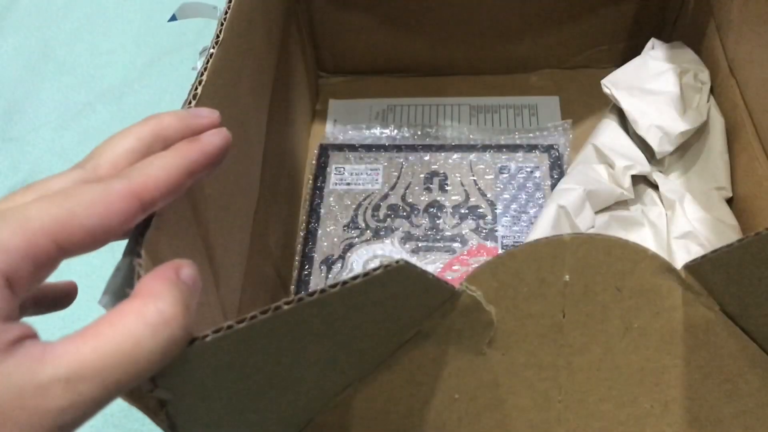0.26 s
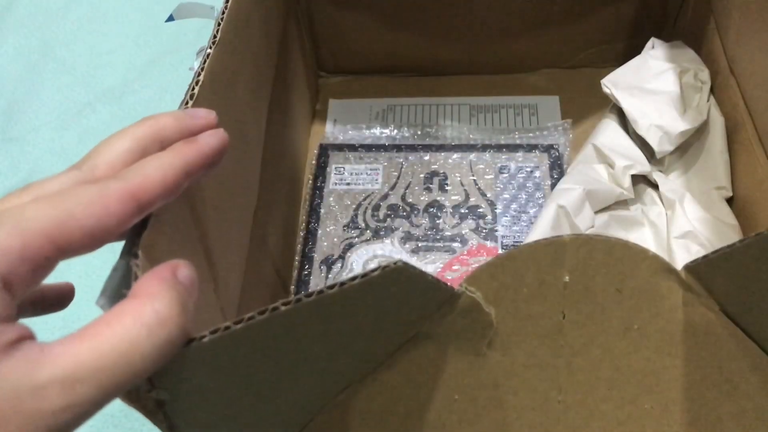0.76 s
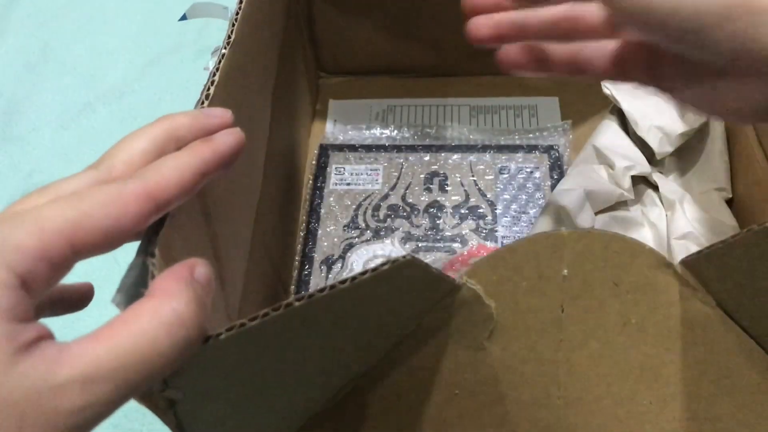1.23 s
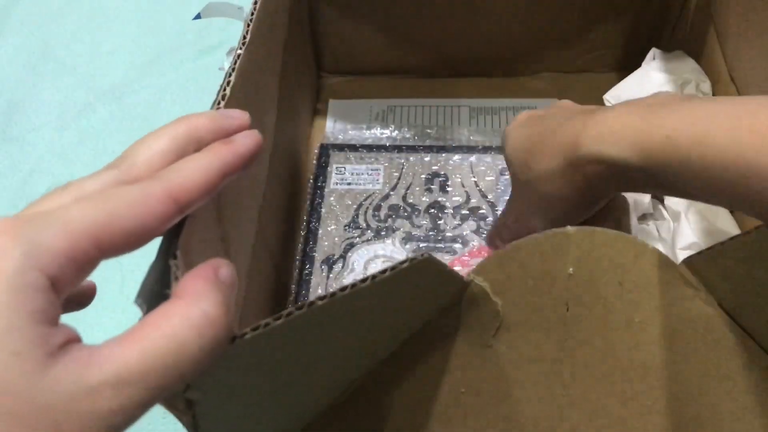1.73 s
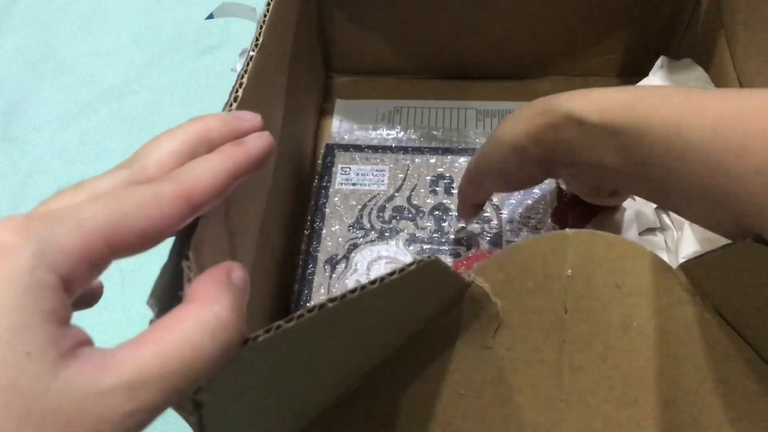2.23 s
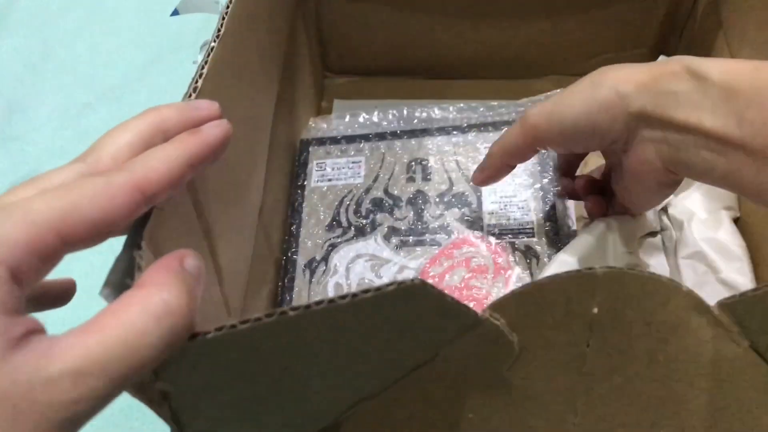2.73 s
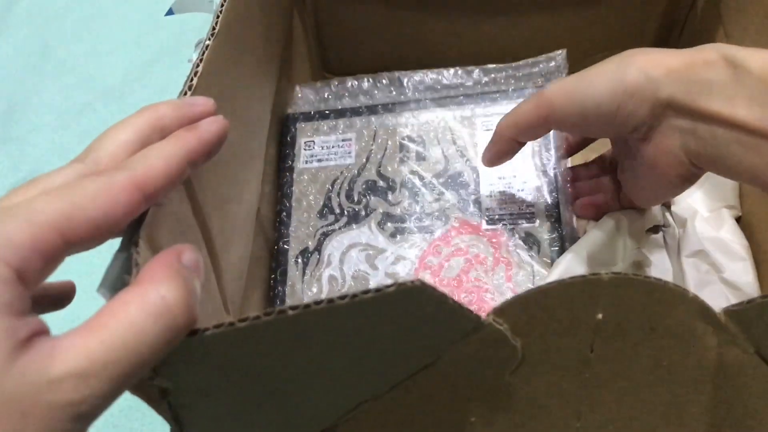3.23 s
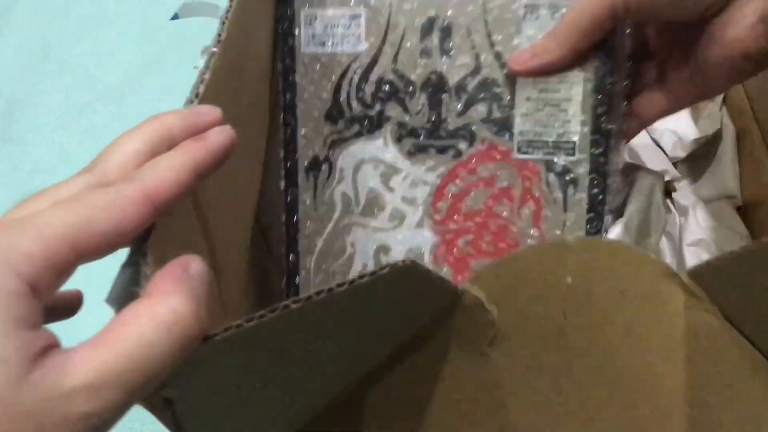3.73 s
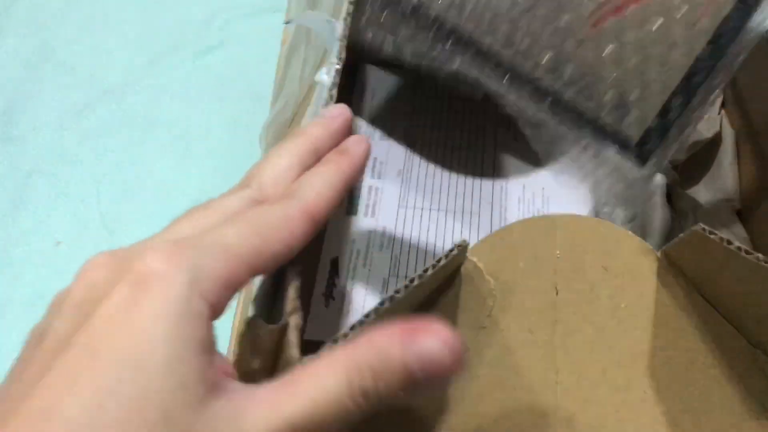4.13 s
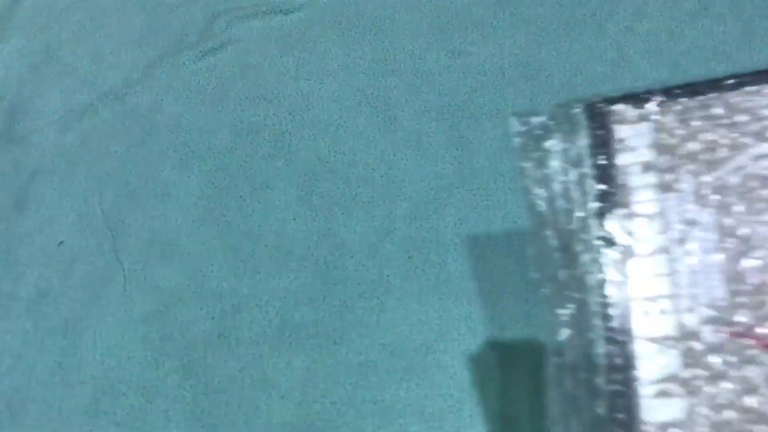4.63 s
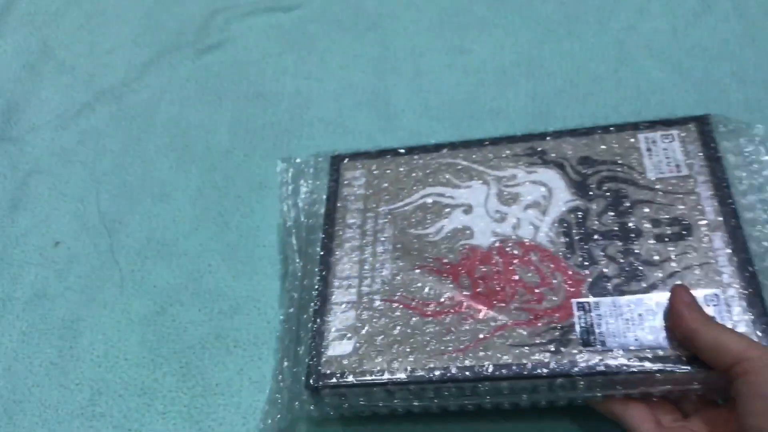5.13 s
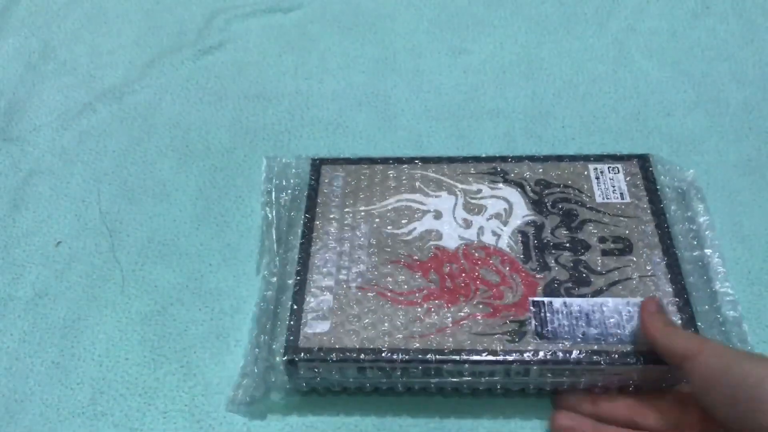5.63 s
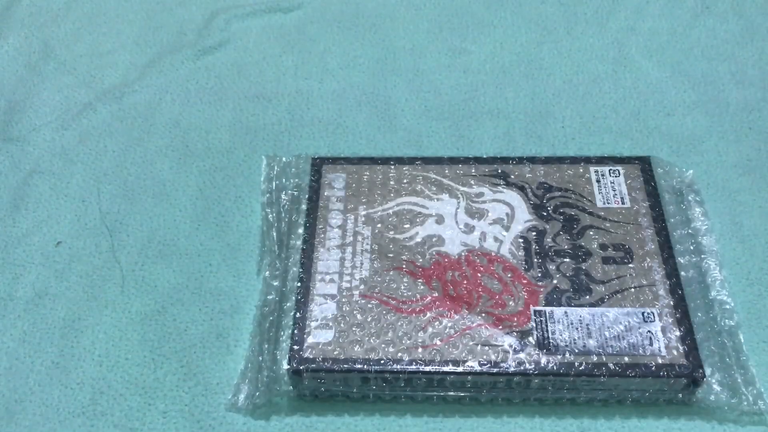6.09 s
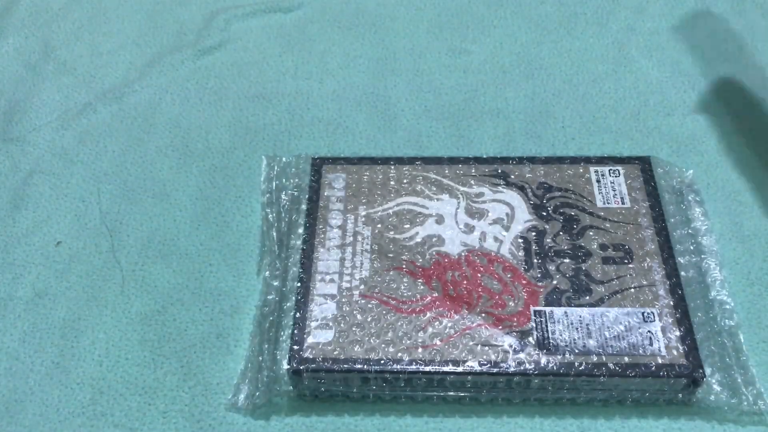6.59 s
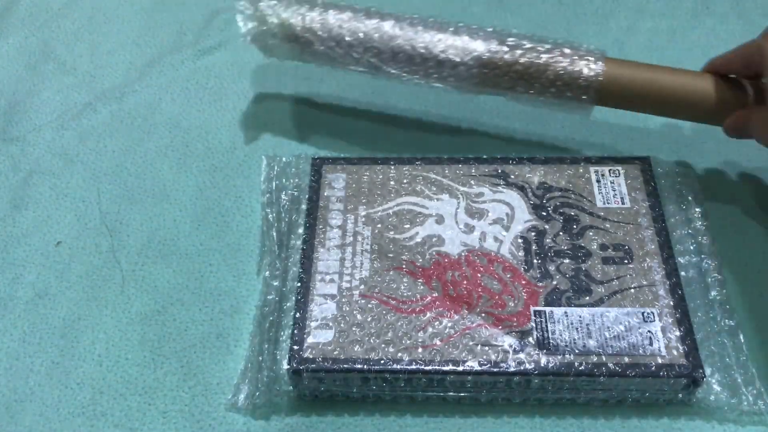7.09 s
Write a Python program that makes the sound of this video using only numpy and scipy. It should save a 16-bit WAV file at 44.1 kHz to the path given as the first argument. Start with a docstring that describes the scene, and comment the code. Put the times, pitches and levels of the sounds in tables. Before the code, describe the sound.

Close-up unboxing: crinkling snaps and rustles swell as a wrapped parcel is pulled from a carton, then lands softly with a crackle and fades to quiet.

```python
"""Small quiet room with faint hum, heard close up: a hand settles on and reaches past crumpled packing paper
in a cardboard box (grain rustle, noise-burst snaps, band-noise slides, decaying-sine knocks), grips a parcel
and drags it out as the box rumbles and booms (filtered noise). At 4.45 s the level dips briefly and the
paper's echoes stop; then plastic film ticks (short noise bursts), faint sine whistles pass, and the parcel
is laid on a soft floor at about 5.4 s with rustle and knocks. Sparse ticks and room tone end it."""
import sys
import numpy as np
from scipy import signal
from scipy.fft import rfft, irfft, next_fast_len
from scipy.io import wavfile
from scipy.ndimage import uniform_filter1d

SR = 44100
rng = np.random.default_rng(int(sys.argv[2]) if len(sys.argv) > 2 else 0)


def unload_wav(signal):
    """Save mono or channel-first audio to the path in sys.argv[1] as 16-bit WAV at rate SR, clipped to [-1, 1]."""
    wavfile.write(
        sys.argv[1],
        SR,
        np.round(np.clip(np.atleast_2d(signal).T, -1, 1) * 32767).astype(np.int16),
    )


N = 324129

# room tone spectrum: [f/Hz, relative level/dB]
AIR_COLOUR = [(15, -60), (25, -27.5), (53, 1), (80, -11.5), (163, -15.5), (378, -27), (651, -25.5),
              (809, -28.5), (1030, -25), (1430, -29.5), (2460, -33.5), (10100, -46.5), (11600, -38.5),
              (16500, -52)]
AIR_RMS_DB = -62.5
# low hum: (mean f/Hz, level/dB before wavering)
HUM = (37, -70)
# faint distant whistles: [t/s, length/s, f/Hz, rms level/dB]
WHISTLES = [(4.787, 0.082, 1770, -77), (5.094, 0.051, 1780, -75), (6.525, 0.091, 2810, -83),
            (6.65, .12, 2550, -83)]
# short slides of sheet on sheet: [t/s, length/s, level/dB before shaping, centre f/Hz, half width/octaves]
SLIDES = [(0, 0.0038, -20.5, 2570, 1.8), (0.042, 0.0027, -53, 4500, 0.97), (0.586, 0.07, -52, 3050, 1.5),
          (0.182, 0.0091, -50, 4330, 0.15), (0.625, 0.028, -46.5, 7160, 0.55),
          (0.701, .045, -48.5, 4900, 1.5), (0.752, 0.052, -44, 3480, 1.8), (0.794, 0.037, -44.5, 3400, 1.7),
          (1.401, 0.062, -67.5, 4970, 1.2), (1.644, 0.022, -47.5, 3970, 1.8),
          (2.061, 0.056, -61, 1280, 0.45), (2.444, 0.074, -59.5, 1090, 0.3),
          (2.607, 0.017, -40.5, 5000, 6.6), (2.633, 0.012, -43, 2440, 0.78),
          (4.244, 0.0091, -36.5, 2000, 2.3), (4.275, 0.16, -42.5, 3730, 1.85),
          (5.411, 0.022, -47.5, 4900, 1.3), (5.628, 0.027, -41, 5100, 1.14), (5.694, 0.04, -43, 4340, 3.3),
          (6.281, 0.096, -62, 5860, 3.9)]
# five hand strokes (settle, reach in, grip, drag out, lay down), each: [t/s, rustle level/dB, brightness/dB]
STROKES = [
    [(0, -65, 0), (.07, -59, -5), (.3, -63, -4.5), (.42, -65, -7), (.5, -60.5, 0), (.58, -59, 0),
     (.68, -58, -2), (.8, -49.5, -11), (.88, -58.5, -1), (1.0, -63.5, 2), (1.1, -81, 14)],
    [(1.35, -78.5, 15), (1.47, -72, -6), (1.56, -76, 4), (1.65, -63, -2), (1.72, -61, -3.5),
     (1.81, -57.5, -18), (1.88, -62, 4), (1.98, -60, 4), (2.04, -67, -2), (2.12, -63, 2), (2.2, -66, 0),
     (2.36, -71, -3), (2.43, -67, 0), (2.5, -61, -9)],
    [(2.52, -63, -4), (2.62, -52.5, 7.5), (2.7, -54, -3.5), (2.77, -51.5, 7), (2.86, -61.5, 8),
     (2.93, -54, 5.5), (3.02, -63, 11), (3.1, -70.5, 13), (3.17, -61.5, 5), (3.3, -55.5, 7)],
    [(3.32, -54, 0), (3.39, -46, -2.5), (3.46, -58, -2), (3.53, -49.5, 0.5), (3.66, -48.5, 0),
     (3.8, -41, -7.5), (3.9, -47, -2), (3.99, -46, 2), (4.06, -47, 7), (4.13, -46, 5), (4.21, -45.5, 3.5),
     (4.28, -39, -4), (4.4, -56, -17), (4.45, -77, -10)],
    [(5.36, -75, -3), (5.4, -71, 1), (5.43, -53, -4), (5.5, -63, 11.5), (5.53, -48.5, -7), (5.6, -53.5, 1),
     (5.72, -51.5, 1), (5.77, -67.5, 7), (5.82, -84, 0)],
]
REST_DB, SETTLE_S = -78, .06  # faint stir between strokes; ramp outside each stroke
# rustling sheet spectrum: [f/Hz, relative level/dB]
SHEET_COLOUR = [(200, -14), (350, -3), (800, 2.5), (1300, 2.5), (2000, 1), (4000, 4), (8600, 2.5),
                (14000, 4.5), (16500, 4.5)]
DULL_HZ, BRIGHT_HZ = 1500, 7000  # crossovers
# dull part: level at -60 dB rustle, dB per dB of rustle, dB lost per dB of brightness
DULL_DB, DULL_FOLLOW, DULL_TILT = -63, 0.78, .6
BRIGHT_DB, BRIGHT_FOLLOW = -60.5, 1.375  # level at -58 dB rustle, dB per dB of rustle
# box walls and enclosed air, spectrum: [f/Hz, relative level/dB]
BOX_COLOUR = [(40, -25), (70, 0), (110, -3), (170, -3.5), (220, -4), (300, -2), (410, -4), (600, -13.5),
              (900, -26)]
# changing load on the box walls: [t/s, rumble level/dB]
WALL_LOAD = [(0, -70), (.3, -66), (.55, -84), (.7, -63), (.8, -48), (1.05, -76.5), (1.38, -80), (1.46, -63),
             (1.58, -74.5), (1.82, -51), (1.88, -61), (2.2, -67), (2.7, -61), (3.2, -71.5), (3.39, -54),
             (3.48, -52.5), (4.0, -53), (4.05, -49), (4.21, -54), (4.28, -41.5), (4.41, -38), (4.46, -61),
             (4.55, -81), (5.38, -66), (5.52, -63.5), (5.7, -58.5), (5.8, -71.5), (7.35, -68.5)]
# knocks on box wall and floor: [t/s, ring level/dB before its rise, f/Hz, t60/s, rumble swell/dB]
KNOCKS = [(.002, -30, 163, 0.056, -44.5), (0.6, -30, 320, 0.012, -46.5), (1.926, -38, 55.4, 0.12, -55),
          (2.114, -28, 316, 0.021, -53), (2.629, -34.5, 87.5, 0.068, -46), (2.758, -43, 114, 0.16, -48.5),
          (2.93, -33.5, 820, 0.022, -64), (3.912, -24, 1800, 0.018, -76), (3.915, -32, 884, 0.036, -73),
          (4.037, -34, 332, 0.063, -63), (4.099, -24, 1070, 0.023, -50), (4.237, -33.5, 272, 0.08, -47.5),
          (5.436, -35.5, 830, 0.018, -56), (5.738, -43, 57.4, 0.06, -49.5)]
LEAD_DB_PER_S, FADE_DB_PER_S = 684, 387  # rumble swell into and out of a knock
# parcel's weight dragging the box bottom: [t/s, boom level/dB]
HEAVE = [(3.85, -67), (3.874, -65), (3.918, -55), (4.222, -49), (4.324, -33.5), (4.402, -42), (4.45, -58)]
# whole box flexing: (f/Hz, width/Hz)
BOOM = (72, 15)
# room decay: [f/Hz, t60/s]
ROOM_DECAY = [(300, 0.38), (1300, 0.53), (3500, 0.26), (9000, 0.096), (16000, 0.12)]
# buckling paper creases: [t/s, peak level/dB, centre f/Hz, dull part re peak/dB, t60/s]
SNAPS = [(0.0435, -27, 1980, -4.5, 0.022), (0.096, -41, 3150, -5, 0.045), (0.1297, -39, 3350, -3.5, 0.072),
         (.171, -37, 2600, -6, 0.025), (.19, -45, 3800, 1, 0.055), (.221, -42.5, 5450, -11, 0.028),
         (.249, -47, 3200, -11, .025), (0.3074, -39.5, 2180, -12, 0.034), (0.4616, -39, 2920, -2.5, 0.011),
         (0.474, -45.5, 2630, -3.5, 0.05), (.4896, -46, 6000, -3, .02), (.5282, -44, 3600, -6, 0.055),
         (.5582, -49, 5440, -18, 0.024), (0.5964, -36, 3130, 1.5, .049), (.718, -35, 7670, -18, 0.011),
         (0.7603, -34, 3400, -2.5, 0.061), (.81, -31.5, 4930, -4, 0.045), (0.8872, -40, 5300, -14, 0.062),
         (0.9004, -45, 3850, 1.5, 0.085), (0.9895, -20.5, 5000, -33, 0.018), (1.585, -45, 3020, -5, 0.025),
         (1.626, -38.5, 3570, -5, 0.041), (1.656, -44.5, 5330, -10, .032), (1.8004, -43, 2600, 6.5, .014),
         (1.818, -32.5, 7200, -8, 0.0086), (1.8405, -34.5, 3630, -5.5, 0.015),
         (1.8907, -39, 7140, -21, 0.012), (1.9016, -40.5, 4370, 1, 0.018), (1.9174, -42, 2930, -4, 0.024),
         (1.9552, -24.5, 3650, -6.5, 0.018), (2.0966, -34.5, 7000, -5.5, 0.0018),
         (2.1132, -24, 3290, -6.5, 0.011), (2.178, -41, 10620, -4, .015), (2.187, -45, 3940, -2, .049),
         (2.211, -47, 10290, -23, 0.0085), (2.2375, -50, 2030, 4, 0.019), (2.3046, -45, 3320, -2, .027),
         (2.3892, -52, 9000, -17, .008), (2.417, -33.5, 4870, -12, 0.0019), (2.457, -44, 2490, -2.5, 0.013),
         (2.5286, -36.5, 8060, -26, 0.0071), (2.5361, -40, 8050, -21, 0.0098),
         (2.5602, -44, 6350, -21, 0.01), (2.5887, -26, 7090, -19, 0.0063),
         (2.5938, -24.5, 4300, -10, 0.0091), (2.605, -30, 5600, -23, 0.02),
         (2.6294, -25, 3000, -0.5, 0.017), (2.6368, -28, 3920, -12, 0.024), (2.689, -39, 3720, -20, 0.032),
         (2.7204, -37, 3560, -31, 0.036), (2.7357, -31.5, 8170, -26, .007), (2.7477, -31, 2930, -3, 0.034),
         (2.775, -26.5, 7600, -35, 0.0033), (2.797, -29, 5860, -8, 0.0067), (2.8254, -36, 8400, -37, .035),
         (2.9291, -31, 3400, -14, 0.0098), (2.9844, -30.5, 5700, -13, .005),
         (3.0138, -33.5, 6300, -38, .004), (3.023, -37, 10600, -28, 0.0079), (3.037, -38, 8310, -30, 0.014),
         (3.0521, -31.5, 6480, -41, 0.0029), (3.0582, -36, 2880, -4, 0.011),
         (3.1235, -48, 6880, -23, 0.0076), (3.1353, -34, 5600, -28, .006), (3.1456, -38, 3360, -4.5, 0.012),
         (3.1715, -32.5, 10680, -33, 0.0062), (3.1852, -41, 6170, -25, 0.0078),
         (3.1936, -36, 9420, -17, 0.0054), (3.2134, -27.5, 11800, -36, 0.0025),
         (3.243, -34.5, 3900, -11.5, 0.0095), (3.296, -38, 6120, -27, 0.0061), (3.32, -31, 8660, -27, .004),
         (3.342, -29, 9100, -25, 0.0053), (3.3943, -36.5, 2350, 1.5, .02), (3.407, -33, 2780, -2, 0.089),
         (3.4657, -26.5, 6800, -27.5, 0.0065), (3.504, -29, 8140, -40, 0.011),
         (3.526, -36, 8300, -22, .004), (3.5474, -31.5, 4730, -15, 0.01), (3.6029, -23, 6250, -28, 0.016),
         (3.617, -24.5, 4700, -12.5, 0.021), (3.6717, -30, 3130, -26, 0.01), (3.7504, -28, 6550, -32, .008),
         (3.812, -30, 3500, -4, 0.011), (3.879, -31, 9000, -26, .012), (3.905, -26, 6820, -15, .007),
         (3.914, -25.5, 6500, -2, .012), (3.924, -31.5, 8550, -7, 0.011), (4.0298, -30.5, 6600, -4, 0.024),
         (4.0995, -28, 4140, -9, 0.019), (4.2371, -29.5, 3650, 2, 0.025), (4.3344, -19, 4700, -13, .003),
         (4.3732, -30, 3180, -4, 0.057), (4.41, -30, 5800, -0.5, 0.053)]
FIZZ_DB, FIZZ_T60_S = -8, 0.0058  # treble edge of every snap, level re its peak
# ticking plastic film: [t/s, peak level/dB, centre f/Hz, half width/octaves]
TICKS = [(4.4763, -39, 4930, .63), (4.491, -43, 9700, 0.76), (4.5063, -39, 6100, .84),
         (4.5814, -30.5, 11600, .2), (4.6622, -51, 3930, 0.65), (4.6766, -46, 5900, 0.82),
         (4.741, -44.5, 3700, .46), (4.7587, -41, 6550, 2.1), (4.7951, -53, 4700, 0.3),
         (4.8658, -35.5, 4640, .81), (4.8863, -46.5, 4260, 0.72), (4.9007, -36, 9860, .42),
         (4.924, -34, 7500, 1.2), (5.047, -55, 5650, .55), (5.061, -45, 5600, .67),
         (5.0655, -45, 4900, 0.58), (5.0779, -42, 3000, 0.24), (5.083, -43, 3390, 0.66),
         (5.0945, -34.5, 4660, 0.82), (5.1318, -44.5, 2860, 0.24), (5.1413, -43, 3960, .53),
         (5.153, -43, 12390, 0.31), (5.1716, -50, 4830, .34), (5.1801, -42, 5460, 0.74),
         (5.2123, -35, 4000, 0.3), (5.2198, -41, 6600, 1.3), (5.275, -39.5, 7360, 1.4),
         (5.2856, -45, 2760, 0.39), (5.2925, -33.5, 5360, 0.64), (5.315, -35, 7960, 0.81),
         (5.3259, -40.5, 3640, 0.69), (5.3318, -42, 4040, 0.69), (5.3661, -49, 5670, .81),
         (5.3885, -41, 8700, 1.1), (5.405, -43, 9440, 0.34), (5.4209, -31, 4800, 0.63),
         (5.4264, -36.5, 4690, 0.86), (5.442, -36, 5710, 1.1), (5.454, -35, 5210, 0.98),
         (5.4704, -33, 8980, 1.1), (5.5093, -34, 4270, 0.36), (5.5205, -31, 5700, .95),
         (5.5269, -30, 5280, 1.2), (5.543, -25, 5410, 1.3), (5.5503, -20.5, 3640, 0.38),
         (5.5794, -27.5, 3630, 0.71), (5.5858, -21.5, 6040, 0.93), (5.6423, -22.5, 5240, 0.38),
         (5.653, -25.5, 4070, 0.31), (5.6704, -26, 6160, 0.6), (5.687, -33, 4120, 0.44),
         (5.7239, -30.5, 4330, 0.51), (5.832, -49, 8750, .47), (5.91, -44, 5800, 1),
         (5.939, -46, 13400, .25), (5.9426, -45, 4400, .2), (5.979, -50, 3890, .34), (6.1487, -49, 4940, 1),
         (6.2076, -52, 4830, 0.23), (6.3703, -54, 6570, .95), (6.382, -44, 3220, 0.66),
         (6.698, -42, 9300, 1.1), (7.0545, -44.5, 4160, 0.44)]
# narrow dips in the microphone's colour: [f/Hz, width/Hz, depth/dB]
NOTCHES = [(572, 139, 5.5), (4960, 880, 2), (8300, 110, 53), (10420, 620, 9)]
# overall level, with a brief dip near 4.45 s: [t/s, gain/dB]
LEVEL = [(0, -1.5), (4.417, 0.5), (4.446, -15), (4.452, -19), (4.489, -2), (7.35, -3.5)]
PAPER_ECHO_END_S = 4.45
LOW_CUT_HZ, HIGH_CUT_HZ = 42, 15780


def gain_of(db):
    return 10 ** (np.asarray(db) / 20)


def evened(x):
    """Scales to rms 1."""
    return x / np.sqrt(np.mean(x ** 2) + 1e-20)


def read(points, hz):
    """Interpolates a table over log frequency."""
    f, value = np.transpose(points)
    return np.interp(np.log(hz + 1), np.log(f + 1), value)


def add(mix, s, sound):
    part = mix[round(s * SR):][:len(sound)]
    part += sound[:len(part)]


def coloured(x, points):
    """Filters by a (Hz, dB) spectrum."""
    size = next_fast_len(len(x))
    hz = np.fft.rfftfreq(size, 1 / SR)
    return irfft(rfft(x, size) * gain_of(read(points, hz)), size)[:len(x)]


def drift(per_s):
    """Slow random wander of rms 1: noise averaged twice over 1/per_s seconds."""
    window = int(SR / per_s)
    return evened(uniform_filter1d(uniform_filter1d(rng.standard_normal(N), window), window))


def band(x, hz, octaves):
    """Band-pass, half width in octaves."""
    edges = hz / 2 ** octaves, min(hz * 2 ** octaves, .45 * SR)
    return signal.lfilter(*signal.butter(2, edges, "band", fs=SR), x)


def crack(noise, hz, octaves, t60, rise=.0001):
    """Dying burst of noise in a band, peak 1; slower decays also rise more slowly."""
    t = np.arange(len(noise)) / SR
    attack = np.minimum(t / (rise + 0.061 * t60), 1)
    decay = gain_of(-60 * t / max(t60, .002))
    burst = band(noise * attack * decay, hz, octaves)
    return burst / abs(burst).max()


def air():
    """Room tone is coloured noise, hum a sine wavering in level and pitch, whistles sine arcs."""
    out = gain_of(AIR_RMS_DB) * evened(coloured(rng.standard_normal(N), AIR_COLOUR))
    hum_hz, hum_db = HUM
    hum_level = gain_of(hum_db + 1.9 * drift(7.1))
    hum_cycles = np.cumsum(hum_hz + 1.83 * drift(10.7)) / SR
    out += hum_level * evened(np.sin(2 * np.pi * hum_cycles))
    for s, length, hz, db in WHISTLES:
        t = np.arange(0, length, 1 / SR)
        arc = np.sin(np.pi * t / length)
        add(out, s, gain_of(db) * evened(arc * np.sin(2 * np.pi * hz * t)))
    return out


def slides():
    """Sliding sheets: band hiss that catches at once, stutters and lets go."""
    out = np.zeros(N)
    t = np.arange(8192) / SR
    for s, length, db, hz, octaves in SLIDES:
        hiss, jitter = rng.standard_normal((2, 8192))
        shape = np.minimum(t / 0.0093, 1) * gain_of(-np.maximum(t - length, 0) * 2300)
        stutter = gain_of(2.0 * evened(uniform_filter1d(jitter, 90)))
        add(out, s, gain_of(db) * shape * stutter * evened(band(hiss, hz, octaves)))
    return out


def handling(column):
    """Stroke control (1 level, 2 brightness), at rest between strokes."""
    t = np.arange(N) / SR
    out = np.full(N, float((0, REST_DB, 0)[column]))
    for stroke in STROKES:
        s, value = np.transpose(stroke)[[0, column]]
        inside = np.clip(1 + np.minimum(t - s[0], s[-1] - t) / SETTLE_S, 0, 1)
        out += inside * (np.interp(t, s, value) - out)
    return out


def patchy(x, patch_db):
    """The colour shifts in time-frequency patches as other folds take the strain."""
    z = signal.stft(x, nperseg=512)[2]
    patches = uniform_filter1d(rng.standard_normal(z.shape), size=9, axis=0)
    patches = uniform_filter1d(patches, size=6, axis=1)
    return signal.istft(z * gain_of(patch_db * evened(patches)), nperseg=512)[1][:N]


def split_bands(x):
    """Dull, middle and bright parts that sum to the whole."""
    size = next_fast_len(len(x))
    hz, z = np.fft.rfftfreq(size, 1 / SR), rfft(x, size)
    dull = 1 / (1 + (hz / DULL_HZ) ** 4)
    bright = 1 - 1 / (1 + (hz / BRIGHT_HZ) ** 4)
    return [irfft(z * share, size)[:len(x)] for share in (dull, 1 - dull - bright, bright)]


def rustle(creases_per_s=900, crowding=.45, spread_db=4.0, clump_db=0.8, rub_db=-3, t60_500hz_s=0.039):
    """Clumps of tiny creases, each a short burst in its own band, over the hiss of sheets sliding."""
    level, brightness = handling(1), handling(2)
    crowd = np.clip(gain_of(crowding * (level + 57)), 1, 6)  # harder handling packs creases closer
    struck = rng.random(N) < creases_per_s * crowd / SR
    size = gain_of(spread_db * np.minimum(rng.exponential(1, N), 4)) * struck
    kind, grains = rng.integers(0, 32, N), np.zeros(N)
    for k, hz in enumerate(np.geomspace(500, 13000, 32)):
        t60 = t60_500hz_s * (500 / hz) ** 0.31  # higher bands die sooner
        grain = evened(crack(rng.standard_normal(768), hz, 0.69, t60, rise=0.00027))
        grains += signal.oaconvolve(size * (kind == k), hz ** 0.18 * grain)[:N]
    sheet = evened(grains / np.sqrt(crowd)) + gain_of(rub_db) * rng.standard_normal(N)
    clumped = patchy(sheet, patch_db=1.5) * gain_of(clump_db * drift(36))
    dull, middle, bright = split_bands(coloured(clumped, SHEET_COLOUR))
    dull_db = DULL_DB + DULL_FOLLOW * (level + 60) - DULL_TILT * brightness
    bright_db = BRIGHT_DB + BRIGHT_FOLLOW * (level + 58) + brightness
    out = gain_of(level) * evened(middle)
    out += gain_of(dull_db) * evened(dull)
    return out + gain_of(bright_db) * evened(bright)


def load():
    """Rumble gain: changing load plus a swell around each knock."""
    t = np.arange(N) / SR
    gain = gain_of(np.interp(t, *np.transpose(WALL_LOAD)))
    for s, _, _, _, swell_db in KNOCKS:
        fall_db = np.maximum(LEAD_DB_PER_S * (s - t), FADE_DB_PER_S * (t - s))
        gain += gain_of(swell_db - fall_db)
    return gain


def box():
    """Walls rumble under load (noise), boom under the drag (resonance) and ring when knocked (sines)."""
    out = load() * gain_of(2.0 * drift(68)) * evened(coloured(rng.standard_normal(N), BOX_COLOUR))
    boom_hz, width_hz = BOOM
    boom = signal.lfilter(*signal.iirpeak(boom_hz, boom_hz / width_hz, SR), rng.standard_normal(N))
    boom /= np.sqrt(uniform_filter1d(boom ** 2, 2500))  # a steady drag keeps it going
    s, db = np.transpose(HEAVE)
    out += gain_of(np.interp(np.arange(N) / SR, s, db, left=-120, right=-120)) * boom
    t = np.arange(8000) / SR
    for s, db, hz, t60, _ in KNOCKS:
        envelope = gain_of(db - 60 * t / t60) * np.minimum(t / 0.0013, 1)
        add(out, s, envelope * np.sin(2 * np.pi * hz * t))
    return out


def room(x):
    """Sparse echoes of random sign, each band dying at its own speed."""
    taps = np.zeros(SR // 2)
    at = np.arange(160, len(taps) - 20, 20)
    taps[at + rng.integers(0, 20, len(at))] = rng.choice([-1., 1.], len(at))
    hz, t, z = signal.stft(taps, SR, nperseg=256)
    decay = gain_of(-60 * t / read(ROOM_DECAY, hz)[:, None])
    tail = signal.istft(z * decay, SR, nperseg=256)[1]
    return signal.fftconvolve(x, tail / np.linalg.norm(tail))[:N]


def snaps():
    """A crease lets go in a short burst with a treble edge; its dull part lingers in the box."""
    out = np.zeros(N)
    for s, db, hz, dull_db, t60 in SNAPS:
        main, dull, fizz = rng.standard_normal((3, 2048))
        add(out, s, gain_of(db) * crack(main, hz, 0.61, t60))
        add(out, s, gain_of(db + dull_db) * crack(dull, 1060, 0.84, t60 + 0.022))
        add(out, s, gain_of(db + FIZZ_DB) * crack(fizz, 9600, 0.37, FIZZ_T60_S))
    return out


def ticks():
    """Stiff film flips with a dry tick: a noise burst of 6.7 ms t60."""
    out = np.zeros(N)
    for s, db, hz, octaves in TICKS:
        add(out, s, gain_of(db) * crack(rng.standard_normal(512), hz, max(octaves, .1), 0.0067, rise=0.0003))
    return out


def scene():
    """Direct sounds and echoes pass the microphone's dips; air joins after."""
    paper, film = snaps() + slides(), ticks()
    near = paper + film + rustle() + box()
    near += gain_of(-15.5) * room(paper) * (np.arange(N) < PAPER_ECHO_END_S * SR)
    near += gain_of(-16) * room(film)
    for hz, width, db in NOTCHES:  # a notch mixed with its input sets the depth
        dip = signal.lfilter(*signal.iirnotch(hz, hz / width, SR), near)
        near = dip + gain_of(-db) * (near - dip)
    return (near + air())[None]


def record(dry):
    """Overall level with its brief dip, then the band limits."""
    s, db = np.transpose(LEVEL)
    out = dry * gain_of(np.interp(np.arange(N) / SR, s, db))
    low_cut = signal.butter(2, LOW_CUT_HZ, "high", fs=SR, output="sos")  # the capsule loses the deepest bass
    out = signal.sosfilt(low_cut, out)
    high_cut = signal.firwin(511, HIGH_CUT_HZ, window=("kaiser", 9), fs=SR)
    return signal.oaconvolve(out, high_cut[None], "same")


dry = scene()
out = record(dry)
unload_wav(out)
```